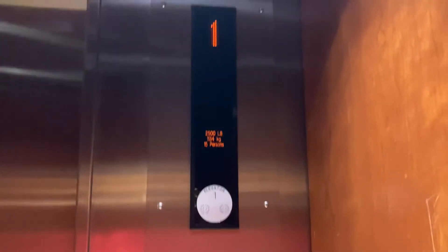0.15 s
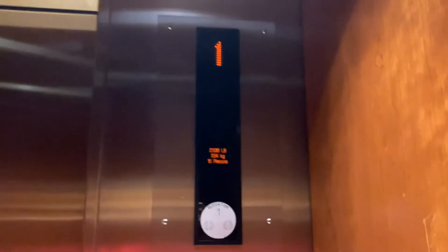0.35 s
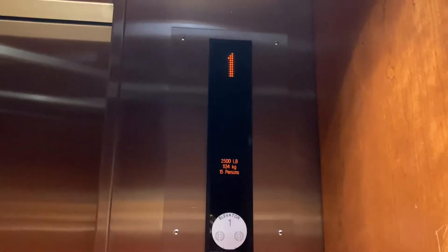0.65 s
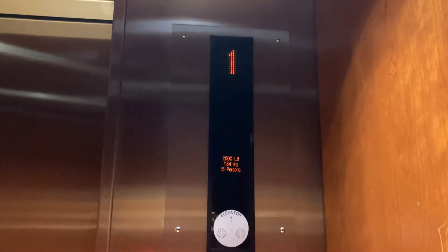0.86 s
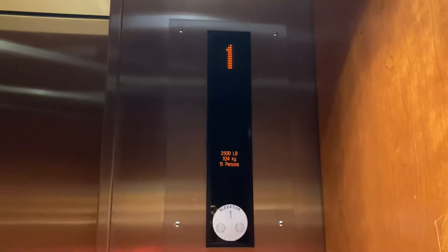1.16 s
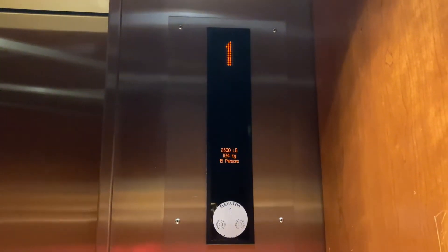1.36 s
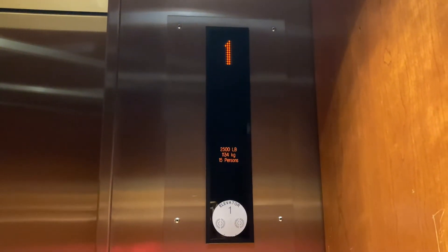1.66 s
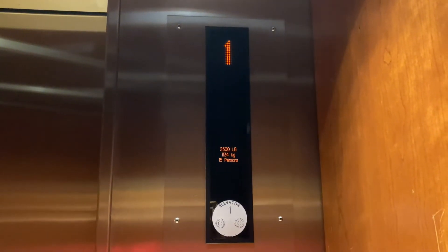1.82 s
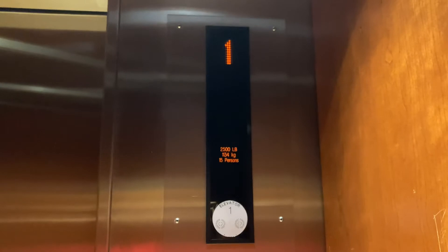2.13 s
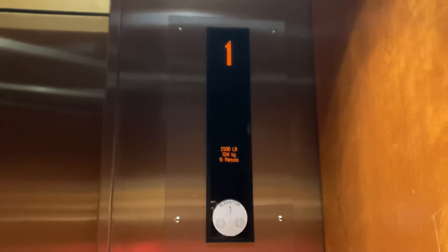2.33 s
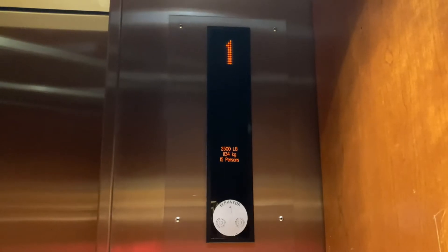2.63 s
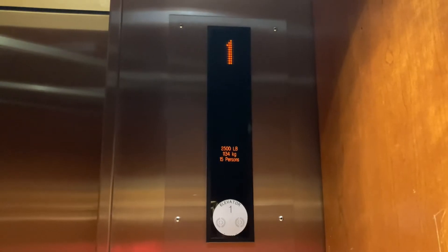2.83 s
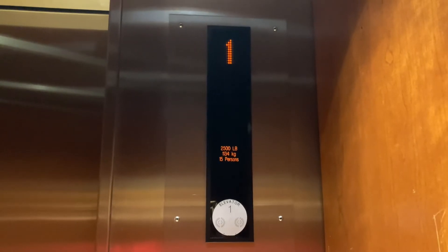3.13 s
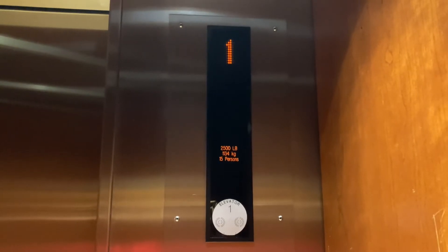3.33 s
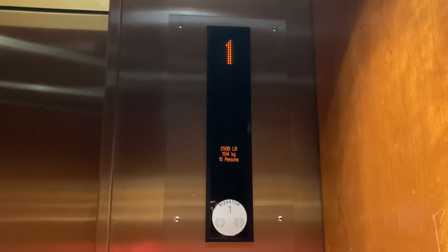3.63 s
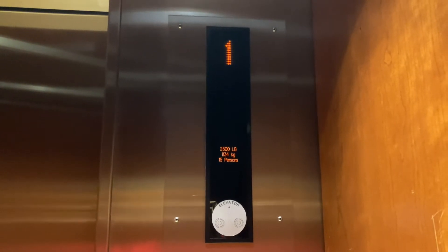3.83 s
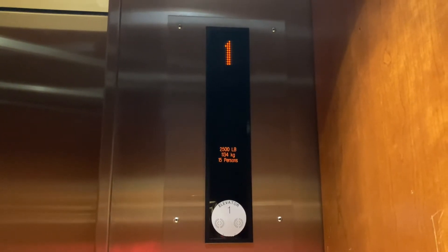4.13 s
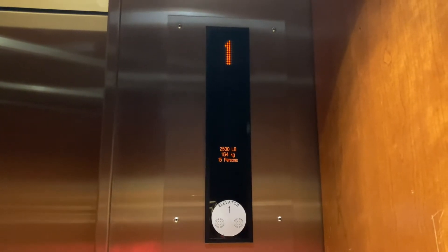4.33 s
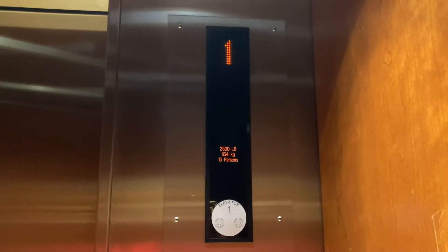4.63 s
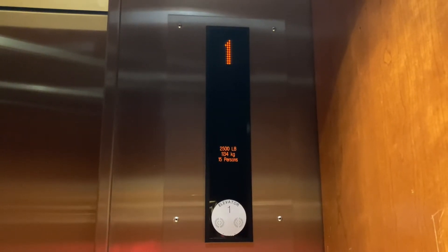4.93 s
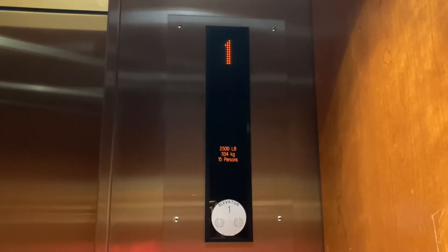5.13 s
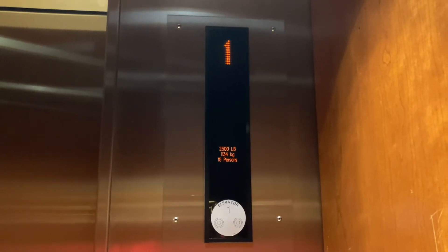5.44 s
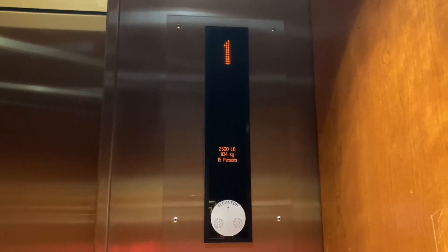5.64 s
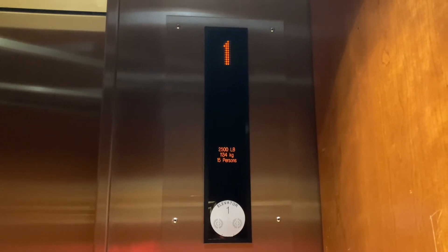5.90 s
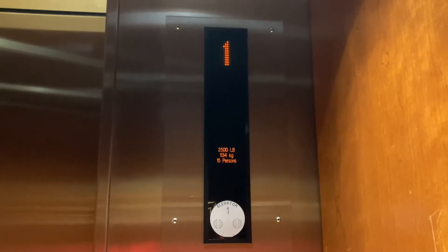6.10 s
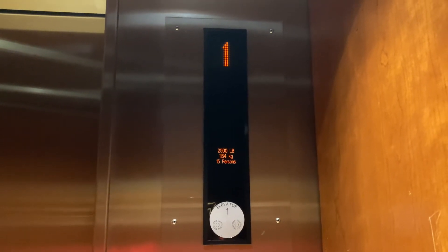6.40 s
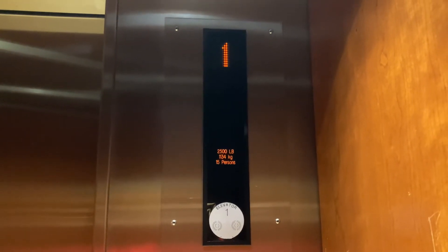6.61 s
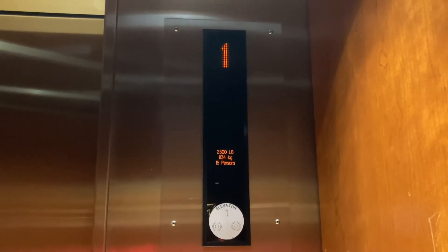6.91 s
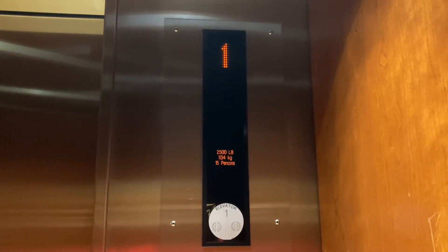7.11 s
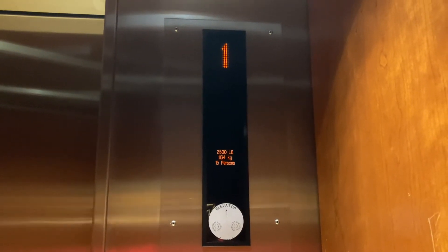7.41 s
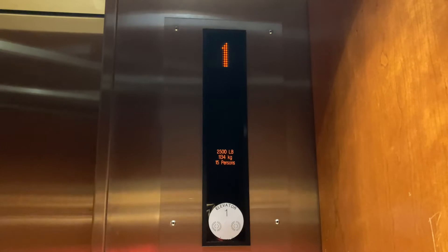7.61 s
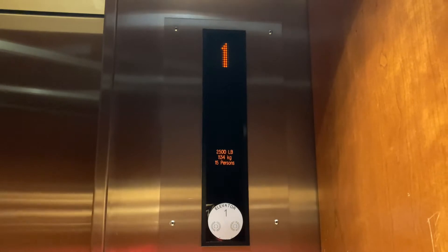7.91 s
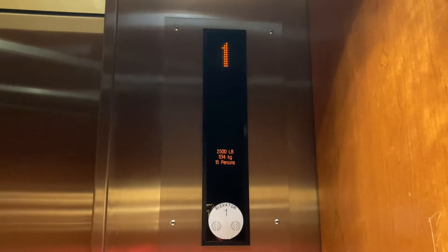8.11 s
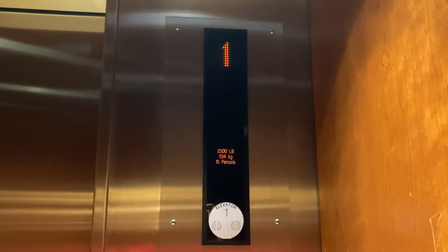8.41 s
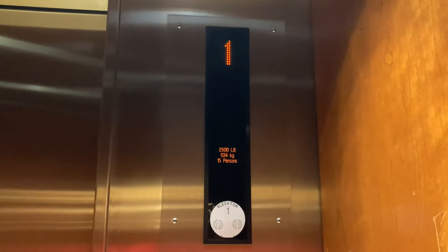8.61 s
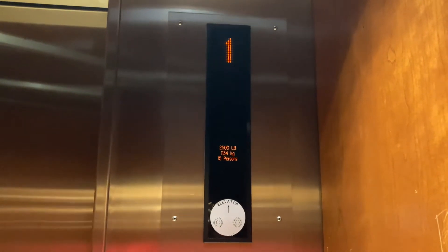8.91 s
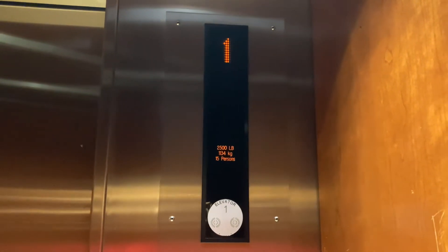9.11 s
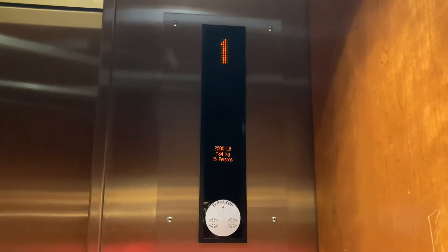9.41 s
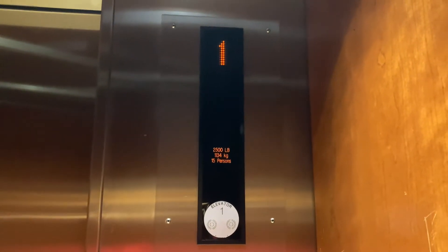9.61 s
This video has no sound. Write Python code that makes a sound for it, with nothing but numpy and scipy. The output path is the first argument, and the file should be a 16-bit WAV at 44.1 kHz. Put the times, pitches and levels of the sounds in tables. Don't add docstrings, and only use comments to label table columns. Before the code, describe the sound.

A lift ride heard close up from within the cab: deep, dark machine rumble throughout, unevenly surging in the enclosed metal room. A buzzing low pump hum holds steady pitch, with faint gear whine above. Soft panel rattle pulses regularly, roughly three times a second. Low wobbling booms come irregularly and become slightly fuller near the end. Tiny guide-rail noises are buried in the ride. There is no start or stop; the motion simply continues.

```python
import sys
import numpy as np
from scipy import signal
from scipy.fft import rfft, irfft, next_fast_len
from scipy.io import wavfile
from scipy.ndimage import map_coordinates

SR = 44100
rng = np.random.default_rng(int(sys.argv[2]) if len(sys.argv) > 2 else 0)


def digitize_waveform(pressure):
    field = np.atleast_2d(pressure).T
    bounded = np.clip(field, -1, 1)
    quanta = np.round(bounded * 32767).astype(np.int16)
    wavfile.write(sys.argv[1], SR, quanta)


def gain_from_db(level_db):
    decades = np.asarray(level_db, float) / 20
    return 10 ** decades


N = 429975

SHAFT_HZ, BELT_HZ = 23.392, 3.037

# (frequency [Hz], level [dB per Hz])
FLOW_SUM = [(22, -76), (45, -67), (75, -46.5), (120, -41.5), (160, -47), (190, -56), (300, -62), (450, -68),
            (700, -76), (1050, -80.5), (1330, -76), (1500, -83.5), (2000, -86.5), (2700, -89)]
# (frequency [Hz], level [dB per Hz])
FLOW_DIFFERENCE = [(22, -85.5), (45, -76), (75, -68), (120, -67.5), (160, -66.5), (190, -68.5),
                   (300, -67.5), (450, -69), (700, -76.5), (1050, -84.5), (1330, -76), (1500, -83),
                   (2000, -84), (2700, -91.5)]
# (frequency [Hz], width [Hz], level [dB])
WAVES_SUM = [(52.3, 2.8, 2.8), (63, 8.6, -3), (72.4, 5.4, -2), (99.7, 3.3, -9.5), (105, 2.6, -1.5),
             (121, 1.8, -4), (129, 7.3, -1.9), (140, 4.5, -6), (157, 2.5, -0.5), (119, 6.8, -6),
             (90, 8.1, -4), (171.1, 1.6, -6.5), (186.5, 2.5, -8), (195, 2.3, -0.5), (223, 4.9, 0.5),
             (205, 2.2, -4), (230, 2.4, -0.5), (244, 27, -5), (234, 4.8, 2), (260.5, 1.4, -7.5),
             (320, 1, 1), (360, 5, -8), (407, 4.1, 6.5), (432, 1.1, -4.5), (432, 4.1, 5), (485, 5.5, -6),
             (542, 3.2, -3.5), (546, 3.4, 3.5), (572, 1.4, -9), (630, 8.8, -3), (642, 7.3, 6.5),
             (650, 2.6, 0), (731, 3, -8.5), (740, 3, -1), (825, 4.5, 5)]
# (frequency [Hz], width [Hz], level [dB])
WAVES_DIFFERENCE = [(29, 5, -0.5), (62, 5, -3.5), (93, 5, 2), (104, 5, -6), (117, 5, 0), (141, 5, -4.5),
                    (159, 5, 4), (119, 9, -5.5), (204, 5, -5), (243, 8, -5.5), (265, 5, -6), (283, 5, 3),
                    (324, 8, -3), (377, 8, -7), (429, 5, -4), (476, 5, 3.5), (509, 5, -3), (542, 12, 7.5),
                    (578, 5, -6.5), (638, 18, 6.5), (740, 5, -5.5), (832, 5, -6.5), (997, 5, 7.5),
                    (1106, 40, -2.5), (1258, 5, 8.5), (1303, 5, -4.5), (1338, 40, 3.5), (1343, 5, 8),
                    (1537, 28, -3), (1692, 18, 7), (2001, 12, -6.5)]
# (frequency [Hz], level [dB per Hz])
HISS_SUM = [(2700, -91), (4000, -96.5), (5300, -103.0), (5800, -108.5), (7500, -107.8), (8500, -115.3),
            (9200, -137.9), (9800, -114.7), (10800, -109.9), (12000, -121), (12900, -123), (14000, -138.8),
            (15200, -136), (16000, -139.3)]
# (frequency [Hz], level [dB per Hz])
HISS_DIFFERENCE = [(2700, -88), (4000, -99.5), (5400, -99.0), (6300, -111.2), (7100, -123.8),
                   (7800, -111.5), (8800, -104.0), (10200, -111.0), (10900, -123.9), (11700, -139.0),
                   (12500, -119.6), (13300, -118.7), (14300, -126.6), (15200, -138.9)]
# (frequency [Hz], in step [ratio], quarter turn ahead [ratio])
PORT_LINK = [(30, 0, 0), (60, -.45, .25), (100, -.6, .7), (160, -.5, .65), (220, -.35, .4), (300, 0, .5),
             (420, .2, .1), (800, .35, 0), (1350, 0.32, .05), (1800, 0, -.1), (5000, -.08, 0)]
# (frequency [Hz], width [Hz], sum level [dB], difference level [dB])
PANEL_MODES = [(970, 13, -4, -2), (1084, 33, -5, 0.5), (1330, 6.5, -4, 1), (1336, 51, 8, 1),
               (1350, 4.6, 3.5, 0), (1372, 4.9, -5, 1), (1381, 7.5, 6.5, 2), (1450, 21, -2.5, -1.5),
               (1540, 28, -1.5, -1.5), (1757, 34, -4, -0.5), (1996, 32, -5, -2.5), (2120, 48, 6, 1.5),
               (3050, 40, 3, 5), (3325, 23, 4.5, 3), (3440, 31, 7, 5), (3890, 24, 6, 7.5),
               (4150, 68, 5, 9.5), (4500, 26, 4, 0), (4610, 25, 3, -1), (4750, 65, 3, 3),
               (5000, 30, 0.5, 0.5), (5350, 34, 3.5, 0), (5450, 27, 4, 0), (6060, 19, -1, 5.5),
               (8960, 270, 7.5, 0)]
# (frequency [Hz], share [0-1])
PANEL_SHARE = [(600, 0.02), (1000, 0.12), (1700, 0.03), (2120, 0.5), (2500, 0.1), (4000, 0.6), (6000, 0.6),
               (9000, 0.7), (11000, 1), (12500, 0.9)]
# (time [s], level [dB])
RAM_SHAKE = [(0, -1), (.9, -4.5), (2.2, -2), (2.8, 1.5), (3.8, -4), (4.5, -0.5), (6.5, 1), (7.2, 0),
             (8.0, 0), (9.2, 3.5), (9.75, 2)]
# (start [s], swell [dB], length [s])
BELT_LAPS = [(0.023, 9.5, 0.12), (0.274, 6.5, 0.15), (0.59, 5.5, 0.097), (0.906, 7, 0.176),
             (1.228, 7, 0.168), (1.537, 7, 0.24), (1.86, 6, 0.169), (2.199, 9.5, 0.134),
             (2.521, 6.5, 0.195), (2.838, 7, 0.194), (3.176, 7.5, 0.16), (3.53, 10, 0.147),
             (3.829, 9, 0.17), (4.185, 11, 0.13), (4.495, 8, 0.166), (4.831, 9.0, 0.17),
             (5.156, 9.5, 0.148), (5.455, 6, 0.216), (5.832, 9.5, 0.147), (6.141, 9.8, 0.179),
             (6.475, 8, 0.152), (6.792, 11.5, 0.158), (7.151, 9, 0.168), (7.474, 8, 0.161),
             (7.792, 7.5, 0.216), (8.145, 6.5, 0.28), (8.49, 8, 0.094), (8.838, 8, 0.13), (9.175, 9, 0.175),
             (9.516, 9, 0.182)]
# (time [s], half length [s], level over the rush [dB])
SHOE_SCUFF = (1.61, .045, 6)
# (time [s], half length [s], level over the hiss [dB])
SHOE_SQUEAK = (5.08, .025, 14)
# (time [s], peak level [dB])
SHOE_TICKS = [
    (3.5362, -74),
    (4.1774, -72),
]
# (time [s], peak level [dB rms], frequency [Hz])
HIGH_BOOMS = [(0.76, -28.5, 160), (1.29, -23, 163), (1.41, -29, 162), (1.72, -26, 155), (1.92, -23, 159),
              (2.23, -22.5, 154.3), (2.49, -20.5, 157), (2.73, -25, 157), (2.89, -25, 159),
              (3.35, -26.5, 152), (3.53, -24.5, 159), (3.99, -23, 159), (4.31, -28, 160.6),
              (4.52, -23, 156), (5.05, -26.5, 160), (5.28, -28.5, 155), (5.39, -26, 158.6),
              (5.58, -27, 157), (5.73, -25.5, 157.3), (5.87, -31, 159), (6.27, -25, 152), (6.4, -27, 159),
              (6.59, -25, 159.7), (7.09, -23.5, 160), (7.49, -21.5, 159), (7.88, -27, 157),
              (8.24, -32, 159), (8.54, -27.5, 155), (8.8, -22.5, 156), (9.01, -29.5, 158.4),
              (9.17, -27.5, 159), (9.46, -26, 159)]
# (time [s], peak level [dB rms], frequency [Hz])
MID_BOOMS = [(0.321, -31, 123), (0.701, -21.5, 118), (0.949, -25.5, 121), (1.35, -24.5, 127),
             (1.61, -22.5, 119), (1.9, -24.5, 118.6), (2.24, -24.5, 122.3), (2.52, -26.5, 126),
             (2.94, -26, 115), (3.07, -22, 119), (3.22, -24, 124.7), (3.621, -25, 117), (4.23, -20.5, 117),
             (4.53, -26.5, 120.2), (4.969, -20, 128), (5.27, -34, 126), (5.61, -21, 117),
             (5.75, -21.5, 119.4), (5.96, -22.5, 117), (6.16, -24, 118.5), (6.35, -26, 123),
             (6.55, -29, 121), (6.67, -22.3, 119), (6.78, -21, 117), (7.17, -26.5, 112.4),
             (7.551, -23, 119), (8.279, -21.5, 123), (8.54, -26, 121), (8.86, -20.5, 119),
             (9.18, -22.5, 119), (9.34, -22, 122), (9.54, -21, 121)]
# (time [s], peak level [dB rms], frequency [Hz])
LOW_BOOMS = [(1.42, -29, 88.4), (2.69, -24.5, 95), (2.86, -26, 90), (3.27, -35, 88), (4.23, -27, 90),
             (4.41, -29.5, 90), (4.68, -28.1, 88.5), (5.25, -32, 91), (5.52, -28, 85.7), (5.76, -31, 87),
             (5.89, -30, 93), (6.2, -33, 92), (6.47, -26, 88), (6.68, -26, 92.4), (6.9, -32, 90.6),
             (7.61, -25.7, 90), (7.81, -33, 83.6), (7.94, -33, 84), (8.27, -25, 93), (8.84, -33, 90.5),
             (9.0, -26, 87.8), (9.25, -21.5, 90)]
# (time [s], peak level [dB rms], frequency [Hz])
DEEP_BOOMS = [(0.92, -25, 70), (2.82, -23, 70), (3.49, -24.5, 70), (4.32, -25.2, 70), (5.01, -25, 70),
              (6.46, -26.4, 70), (7.22, -23.7, 70), (7.53, -25.5, 70), (7.98, -25.3, 70), (8.42, -24, 70),
              (8.64, -26, 70), (8.8, -25.5, 70), (9.06, -24.5, 70), (9.32, -24, 70), (9.63, -25.5, 70)]
# (shaft order [1], belt sideband [1], sum level [dB rms], difference level [dB rms]); the row (5,
# 1) is the 120 Hz mains hum of the motor, which falls on that order and sideband
PUMP_TONES = [(2, 0, -56.0, -78.4), (3, 0, -29.4, -53.1), (4, 0, -38.5, -58.8), (4, 1, -48, -68),
              (5, 1, -31, -50.9), (6, 0, -40.0, -61.1), (8, 1, -54.9, -55.4), (9, 0, -52.6, -61.9),
              (11, 0, -48.9, -57.3), (11, 1, -49.5, -57.4), (11, 2, -60.6, -90.0), (12, 0, -48.5, -54.6),
              (12, 2, -53.7, -90.0), (13, -1, -49, -66.5), (13, 0, -44.8, -56.9), (13, 1, -46.6, -57.6),
              (14, 1, -46.8, -61.8), (14, 2, -53.7, -71.6), (14, 3, -56.5, -74.5), (15, 0, -57.2, -53.2),
              (15, 3, -64.1, -63.7), (16, 0, -61.9, -90.0), (16, 2, -61.4, -65.9), (18, 0, -45.7, -57.2),
              (20, 0, -55.0, -68.5)]
# (shaft order [1], belt sideband [1], sum [dB rms], difference [dB rms])
WHINE_TONES = [(21, 0, -66.4, -57.1), (25, 0, -70.3, -70.8), (25, 1, -60.2, -67.0), (26, 1, -67.6, -61.9),
               (27, 0, -58.9, -59.0), (27, 1, -60.5, -51.4), (28, 0, -60.5, -66), (28, 1, -58.5, -59.8),
               (28, 2, -66, -72), (29, 1, -67.8, -90.0), (30, 0, -58.2, -66.6), (33, 0, -69.1, -75.1),
               (44, 0, -69.9, -73.4), (54, 2, -65.9, -90.0), (56, 1, -69, -75), (56, 2, -65, -75),
               (57, 2, -58.5, -62.7), (57, 3, -63, -66), (59, 2, -60, -72.5), (59, 3, -66, -74),
               (60, 2, -69.5, -90.0)]
# (shaft order [1], belt sideband [1], sum [dB rms], difference [dB rms])
FIFTH_THROB = [
    (5, -1, -41, -63),
    (5, 0, -41, -61),
    (5, 3, -44, -65),
]
ORDER_LEADS = [(3, .3, 2.4), (5, .3, 1.9), (9, 1, 2.5), (11, 1.5, 1.9), (13, -.7, 1.7), (14, -2.4, .9),
               (15, 0, -1.3), (18, 0, 1.4), (21, 0, -1.1), (27, .4, -2.3), (28, .05, -1.4), (60, -.9, -.5)]


def unit(x):
    return x / np.sqrt(np.mean(x ** 2) + 1e-20)


def along(points, hz, column=1):
    table = np.array(points)
    return np.interp(np.log(hz + 1), np.log(table[:, 0] + 1), table[:, column])


def wobble(rate):
    knots = rng.standard_normal(int(N * rate / SR) + 4)
    return map_coordinates(knots, [np.arange(N) * rate / SR])


def bell_at(t, centre, width):
    return np.exp(-.5 * ((t - centre) / width) ** 2)


def above(hz, edge_hz):
    return 1 / (1 + (edge_hz / (hz + 1)) ** 8)


def between(hz, low_hz, high_hz):
    return above(hz, low_hz) * (1 - above(hz, high_hz))


def shake():
    return np.interp(np.arange(N) / SR, *np.transpose(RAM_SHAKE))


def laps():
    rise_s, fall_s = 0.026, 0.03
    t = np.arange(0, N + 64, 64) / SR
    start, swell_db, length = np.transpose(BELT_LAPS)
    late = t[:, None] - start
    rise = 1 + np.tanh(late / rise_s)
    fall = 1 - np.tanh((late - length) / fall_s)
    swells = swell_db * rise * fall / 4
    return np.interp(np.arange(N) / SR, t, swells.sum(axis=1))


def fizz_share(hz):
    return np.clip(along(PANEL_SHARE, hz), 0, 1)


def whine_share(hz):
    return bell_at(hz, 1330, 110)


def sway(hz):
    return unit(gain_from_db(2.2 * shake() + 1.2 * wobble(2.5))), 1 - above(hz, 67)


def drone(hz):
    swell = unit(gain_from_db(0.6 * shake() + 0.11 * laps() + 0.85 * wobble(5.3)))
    return swell, between(hz, 33, 106.6)


def rumble(hz):
    swell = unit(gain_from_db(0.091 * shake() + 0.036 * laps() + 0.83 * wobble(1.8)))
    return swell * gain_from_db(1.1 * wobble(4.8)), between(hz, 100, 180)


def murmur(hz):
    return gain_from_db(0.66 * wobble(4.0)), between(hz, 168, 482)


def rush(hz):
    swell = unit(gain_from_db(0.0085 * laps() + .3 * wobble(1.0))) * gain_from_db(1.0 * wobble(9.5))
    return swell, above(hz, 500) * (1 - fizz_share(hz)) * (1 - whine_share(hz))


def gear_mesh(hz):
    t = np.arange(N) / SR
    swell = unit(gain_from_db(2.9 * np.cos(2 * np.pi * SHAFT_HZ * t + 0.94)))
    return swell, (1 - fizz_share(hz)) * whine_share(hz)


def squeak(hz):
    s, half_s, db = SHOE_SQUEAK
    return gain_from_db(db) * bell_at(np.arange(N) / SR, s, half_s), above(hz, 11600) - above(hz, 12300)


def scuff(hz):
    s, half_s, db = SHOE_SCUFF
    return gain_from_db(db) * bell_at(np.arange(N) / SR, s, half_s), above(hz, 1400) - above(hz, 2400)


def panel_part(slap, depth, patchy_db):
    t = np.arange(N) / SR
    laps_db = laps() + .7 * slap
    turn_db = 1.1 * np.cos(2 * np.pi * SHAFT_HZ * t + 0.56)
    return unit(gain_from_db(depth * laps_db + turn_db + patchy_db * wobble(15) + 2.8 * wobble(300)))


def loose_panel(hz):
    slap = wobble(28)
    parts = [(0.62, 1.5, 1 - above(hz, 2800)),  # (depth, patchiness in dB, band)
             (0.5, 2.0, between(hz, 3430, 3700)),
             (1.0, 1.5, between(hz, 4500, 5900)),
             (1.0, 1.0, between(hz, 6500, 9500)),
             (1.5, 1.8, between(hz, 9500, 11800)),
             (1.3, 3.5, above(hz, 13000))]
    return [(panel_part(slap, depth, patchy_db), fizz_share(hz) * band) for depth, patchy_db, band in parts]


def port_link(hz):
    z = along(PORT_LINK, hz) + 1j * along(PORT_LINK, hz, column=2)
    return z / np.maximum(1, abs(z) / .99)


def colour(low, waves, high, hz, column):
    level = np.where(hz < high[0][0], along(low, hz), along(high, hz))
    modes = list(waves) + [(row[0], row[1], row[column]) for row in PANEL_MODES]
    for centre, width, db in modes:
        level = level + db * bell_at(hz, centre, width)
    knots = rng.standard_normal(3000)
    ripple = 1.1 * map_coordinates(knots, [hz / 12]) * np.clip((hz - 700) / 300, 0, 1)
    return gain_from_db(level + ripple) * np.sqrt(SR / 2)


def flow():
    size = next_fast_len(N + SR // 2)
    hz = np.fft.rfftfreq(size, 1 / SR)
    sources = [source(hz) for source in (sway, drone, rumble, murmur, rush, gear_mesh, squeak, scuff)]
    pair = np.zeros((2, len(hz)), complex)
    for swell, share in sources + loose_panel(hz):
        pair += rfft(swell * rng.standard_normal((2, N)), size) * np.sqrt(share)
    likeness = port_link(hz)
    centre = pair[0] * colour(FLOW_SUM, WAVES_SUM, HISS_SUM, hz, column=2)
    width = likeness * pair[0] + np.sqrt(1 - abs(likeness) ** 2) * pair[1]
    width = width * colour(FLOW_DIFFERENCE, WAVES_DIFFERENCE, HISS_DIFFERENCE, hz, column=3)
    return irfft([centre, width], size)[:, :N]


def ticks():
    out, t = np.zeros((2, N)), np.arange(400) / SR
    for s, db in SHOE_TICKS:
        burst = np.diff(rng.standard_normal(401)) * gain_from_db(db + 12 - 60 * t / .008)
        first = round(s * SR)
        out[:, first:first + 400] += burst
    return out


def booms(bed):
    half_s, trim_db = 0.047, -2.34
    width_db, lead = -19, 2.2
    out, t = np.zeros((2, N + SR)), np.arange(-SR // 4, SR // 4) / SR
    bell, ringing = bell_at(t, 0, half_s), np.pad(bed, SR // 4)
    for s, db, hz in list(HIGH_BOOMS) + list(MID_BOOMS) + list(LOW_BOOMS) + list(DEEP_BOOMS):
        first = round(s * SR)
        heard = ringing[first:][:len(t)] * bell
        there = 2 * np.sum(heard * np.exp(-2j * np.pi * hz * t)) / bell.sum()
        phase = 2 * np.pi * hz * t + np.angle(there)
        swell = max(np.sqrt(2) * gain_from_db(db + trim_db) - abs(there), 0) * bell
        pair = swell * np.array([np.cos(phase), gain_from_db(width_db) * np.cos(phase + lead)])
        out[:, first:][:, :len(t)] += pair
    return out[:, SR // 4:][:, :N]


def pump():
    t = np.arange(N) / SR
    shaft = 2 * np.pi * SHAFT_HZ * t + .03 * wobble(.4) - 3.4
    start = rng.normal(0, 0.91, 64)
    orders, lap_lead, port_lead = np.transpose(ORDER_LEADS)
    out = np.zeros((2, N))
    for order, band, sum_db, difference_db in list(PUMP_TONES) + list(WHINE_TONES) + list(FIFTH_THROB):
        belt = 2 * np.pi * BELT_HZ * t + np.interp(order, orders, lap_lead)
        phase = order * shaft + band * belt + start[int(order)] + 0.17 * wobble(4)
        ahead = np.interp(order, orders, port_lead)
        unsteady = min(1, (order + 3) / 9, 35 / order)
        drift = np.sqrt(2) * gain_from_db(unsteady * (1.0 * wobble(2.2) + 0.89 * wobble(6)))
        out[0] += drift * gain_from_db(sum_db) * np.sin(phase)
        out[1] += drift * gain_from_db(difference_db) * np.sin(phase + ahead)
    return out


def scene():
    bed = flow() + pump()
    centre, width = bed + booms(bed[0])
    return np.array([centre + width, centre - width]) + ticks()


def band_limit(x):
    return signal.sosfilt(signal.butter(12, 15200, fs=SR, output="sos"), x)


def record(dry):
    return band_limit(dry)


dry = scene()
out = record(dry)
digitize_waveform(out)
```